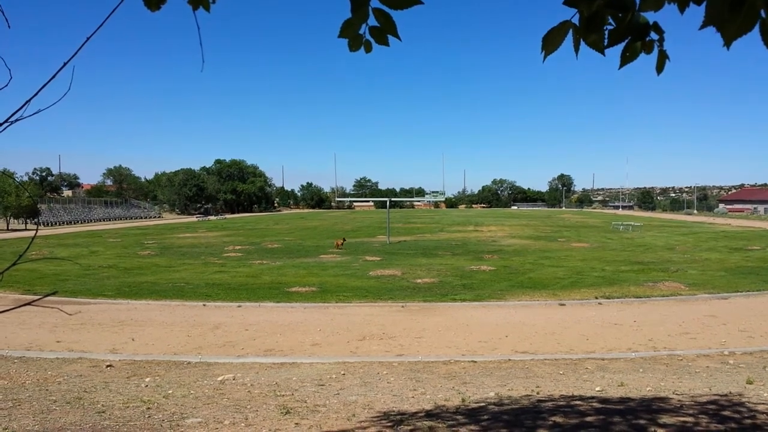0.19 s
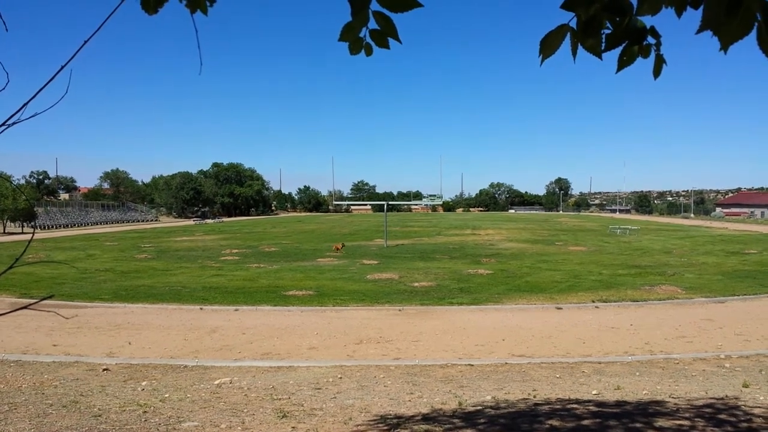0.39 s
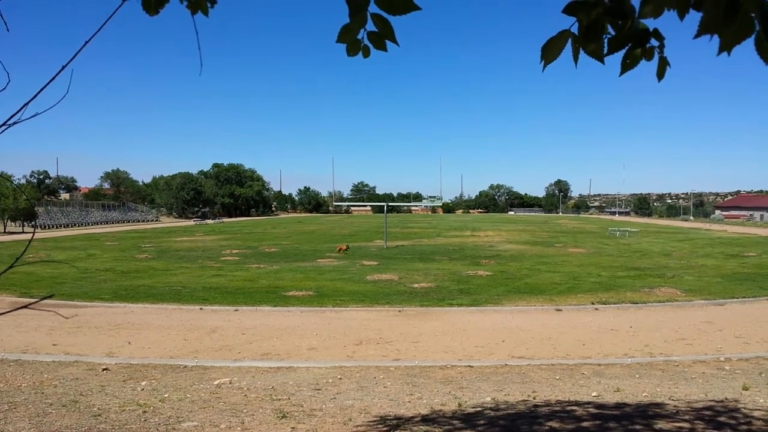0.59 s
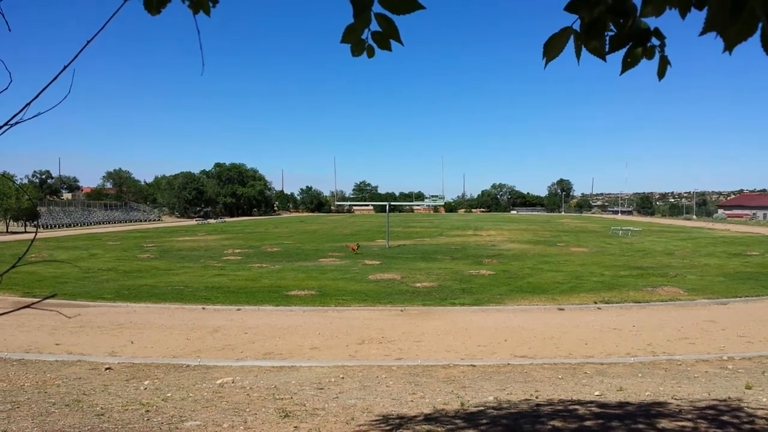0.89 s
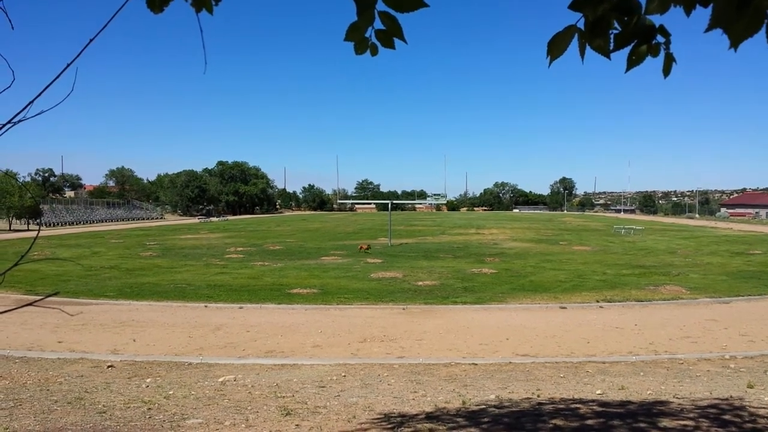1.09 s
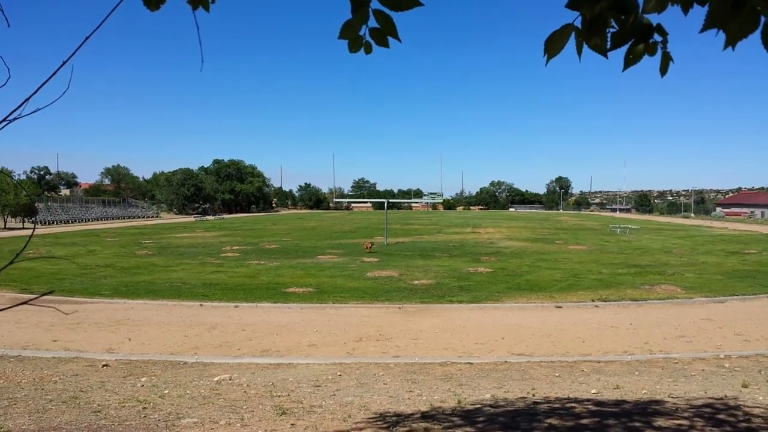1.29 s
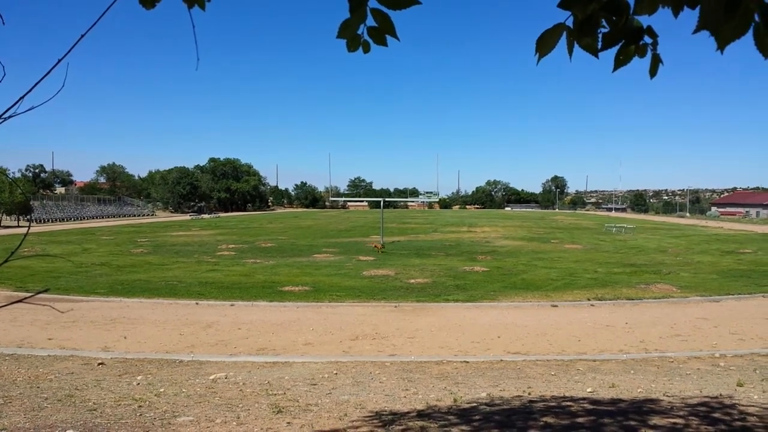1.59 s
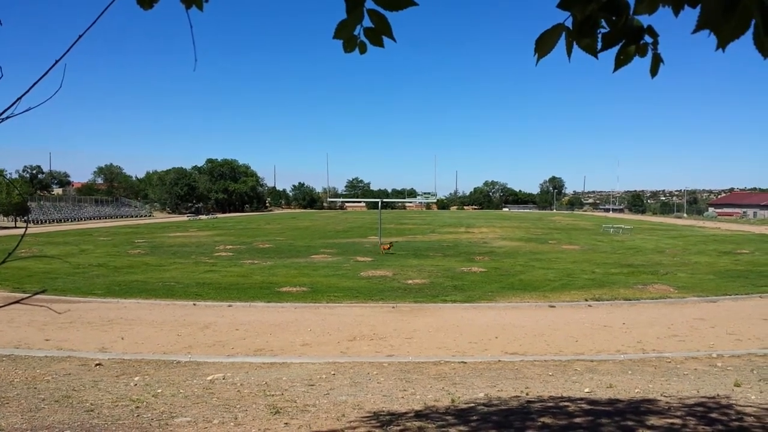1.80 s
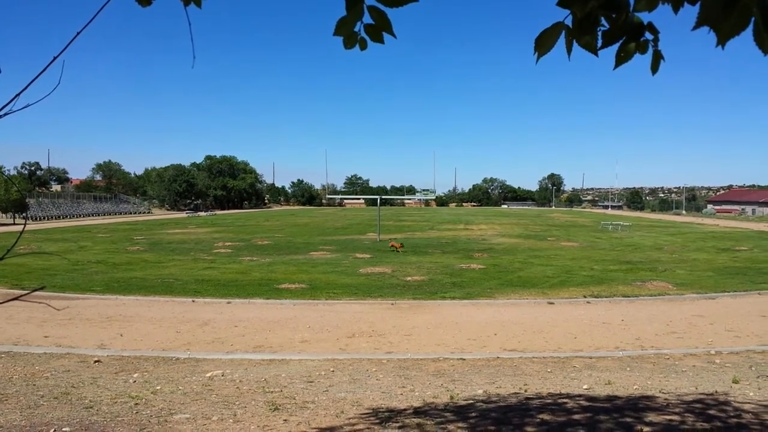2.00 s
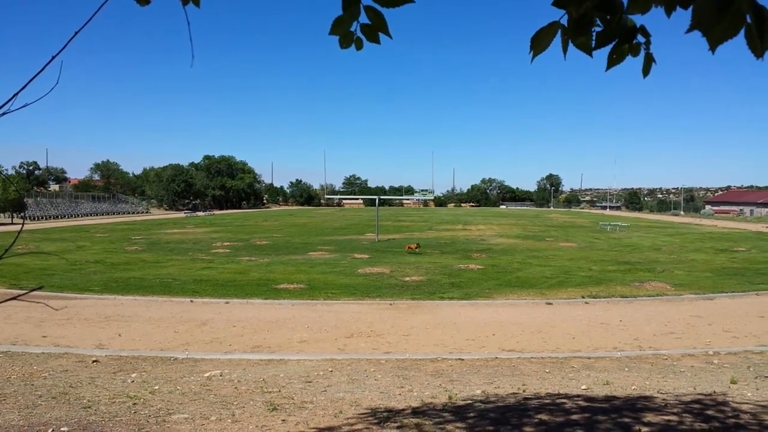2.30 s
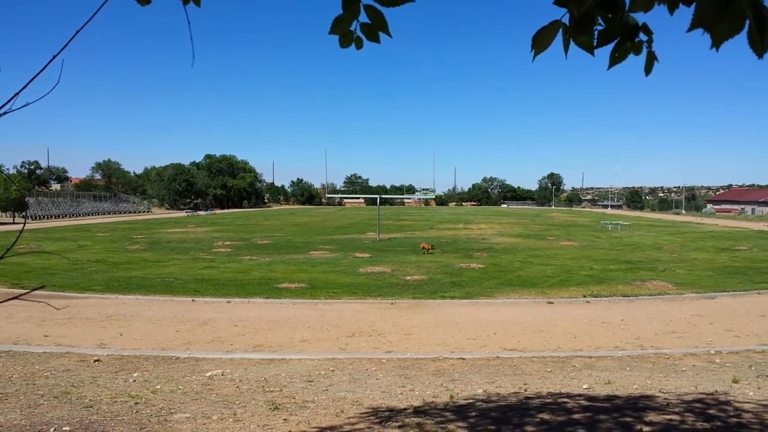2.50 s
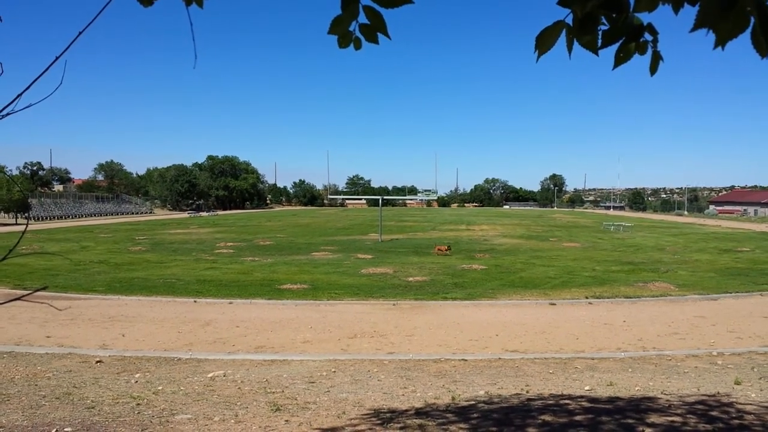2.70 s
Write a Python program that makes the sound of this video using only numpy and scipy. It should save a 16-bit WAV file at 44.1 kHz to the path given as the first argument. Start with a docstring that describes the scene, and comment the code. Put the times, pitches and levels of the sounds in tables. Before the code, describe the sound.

A prairie dog calls briefly in an open field, with close snaps and far engine throb.

```python
"""An open field: low rumble, outdoor air and a soft hiss, with faint bird-like chirps in the distance.
In the first half second, dry snaps and two gritty scuffs sound right by the microphone; sparser snaps
follow. A far engine throbs, its firings ringing the exhaust, and swells from about 1.3 s. At 1.56 s a
prairie dog gives a high yip, then two fluttering cries: buzz and breath shaped by its throat.
The engine falls back, and one last sharp snap lands at 2.6 s."""
import sys
import numpy as np
from scipy import signal
from scipy.fft import rfft, irfft
from scipy.io import wavfile
from scipy.ndimage import uniform_filter1d

SR = 44100
rng = np.random.default_rng(int(sys.argv[2]) if len(sys.argv) > 2 else 0)


def persist_wave(psi):
    """Save psi, clipped to +-1, as 16-bit WAV."""
    counts = np.round(np.clip(psi, -1, 1) * 32767).astype(np.int16)
    wavfile.write(sys.argv[1], SR, np.atleast_2d(counts).T)


N = 125685


def amp(db):
    """Decibels to gain."""
    return 10 ** (np.asarray(db) / 20)


def unit(x):
    """Scales to rms 1."""
    return x / np.sqrt(np.mean(x ** 2) + 1e-20)


def curve(table, t):
    """Automation: each column after the first, read at the times t."""
    times, *columns = np.transpose(table)
    return [np.interp(t, times, column) for column in columns]


def colour(x, table, column=1):
    """EQ by one gain column of a spectrum table."""
    columns, hz = np.transpose(table), np.fft.rfftfreq(x.shape[-1], 1 / SR)
    gain_db = np.interp(np.log(hz + 1), np.log(columns[0]), columns[column])
    return irfft(rfft(x) * amp(gain_db), x.shape[-1])


def pan(db):
    """Stereo gains for a level difference; positive leans left."""
    return amp(np.array([[db], [-db]]) / 2)


def add(mix, start_s, sound):
    """Mixes a sound in at start_s."""
    part = mix[:, max(round(start_s * SR), 0):][:, :sound.shape[-1]]
    part += sound[..., :part.shape[1]]


def wander(count, size):
    """Random drift of rms 1, smoothed over size samples."""
    return unit(uniform_filter1d(uniform_filter1d(rng.standard_normal(count), size), size))


def field_echo(x, wet_db, t60_s=0.17):
    """Thin scattered echoes from the ground and trees."""
    t = np.arange(SR // 2) / SR
    taps = rng.standard_normal((2, len(t))) * (rng.random((2, len(t))) < .05)
    taps *= amp(-60 * t / t60_s) * (t > .003)
    taps /= np.linalg.norm(taps, axis=1, keepdims=True)
    echoes = signal.fftconvolve(x, taps, axes=1)[:, :N]
    return (x + amp(wet_db) * echoes) / np.hypot(1, amp(wet_db))


def wash(spectrum, level_db, correlation, drift_db):
    """Coloured noise, partly shared by both sides, with a drifting level."""
    left, spread = rng.standard_normal((2, N))
    right = correlation * left + np.sqrt(1 - correlation ** 2) * spread
    noise = unit(colour(np.array([left, right]), spectrum))
    return noise * amp(level_db + drift_db * wander(N, size=1500))


def background():
    """The bed: low rumble near the centre, distant outdoor air and a fine, wide hiss."""
    # fader moves: time_s, rumble_db, air_db, hiss_db
    levels = [(0, -46.5, -55, -61.5), (.2, -59, -59, -65), (.4, -58, -62.5, -68.5), (.65, -63, -69, -74.5),
              (1.05, -61, -68, -74), (1.35, -49.5, -59.5, -65), (1.7, -44, -53.5, -62),
              (2.2, -43.5, -52.5, -59.5), (2.55, -44, -54, -60), (2.85, -52.5, -56, -62.5)]
    # EQ of each layer: frequency_hz, gain_db
    rumble_eq = [(20, -15.5), (45, -9.5), (80, 7), (130, -2.5), (200, 0.5), (300, -10.5), (500, -31),
                 (1000, -57)]
    air_eq = [(100, -24), (280, 2), (450, -1.5), (700, -3), (1000, -1.5), (1400, -11.5), (2000, -21),
              (3000, -21.5), (5000, -32), (10000, -56.5)]
    hiss_eq = [(500, -9.5), (2000, 5), (3000, -1.5), (5000, -2), (6800, -1.5), (7900, 0.5), (9000, -4),
               (12000, -4), (14500, -2.5), (14900, -26.5), (16000, -33.5)]
    rumble_db, air_db, hiss_db = curve(levels, np.arange(N) / SR)
    rumble = wash(rumble_eq, rumble_db, correlation=0.94, drift_db=2.0)
    air = wash(air_eq, air_db, correlation=.55, drift_db=0.9)
    hiss = wash(hiss_eq, hiss_db, correlation=0.033, drift_db=1.5)
    return rumble + air + hiss * pan(-.8)


def far_chirps(waver=.03):
    """Thin wavering whistles from far away, each gliding through three pitches."""
    # whistles: start_s, length_s, start_hz, middle_hz, end_hz, level_db
    chirps = [(0.013, 0.094, 2950, 2510, 2350, -67.5), (0.097, 0.038, 3650, 3400, 2800, -67.5),
              (0.294, 0.029, 4480, 4460, 4480, -67), (0.628, 0.03, 2600, 3050, 2980, -77.5),
              (.672, 0.02, 2750, 2660, 2400, -76.5), (0.982, 0.041, 4700, 4350, 3915, -70.5),
              (1.0, 0.066, 4400, 4790, 4830, -82), (1.005, 0.0502, 3900, 4226, 4210, -77),
              (1.283, .045, 2450, 2220, 1940, -77.5), (2.636, 0.038, 2400, 2640, 2640, -60),
              (2.786, 0.056, 4350, 4450, 4300, -65)]
    out = np.zeros((2, N))
    for start_s, length_s, *pitches_hz, level_db in chirps:
        progress = np.linspace(0, 1, round(length_s * SR))
        glide_hz = np.polyval(np.polyfit([0, .5, 1], pitches_hz, 2), progress)
        pitch_hz = glide_hz * (1 + waver * wander(len(progress), size=50))
        arch = np.sqrt(2 * abs(np.sin(np.pi * progress)))
        add(out, start_s, amp(level_db) * arch * np.sin(2 * np.pi * np.cumsum(pitch_hz) / SR))
    return out


def far_engine(uneven_db=1):
    """Uneven firings ring the exhaust over a clean hum at the firing rate."""
    # engine speed: time_s, firing_hz
    speed = [(0, 80), (.5, 78.3), (.8, 78.8), (1.35, 82.3), (1.65, 84.3), (1.95, 87.5), (2.25, 89.9),
             (2.55, 89.7), (2.85, 88)]
    # fader moves: time_s, hum_db, throb_db
    levels = [(0, -92, -54), (.2, -65, -53.5), (.4, -61, -62), (.65, -58.5, -68.5), (1.1, -58.5, -63.5),
              (1.3, -58, -50.5), (1.48, -43.5, -42.5), (1.8, -44, -41.5), (2.0, -41.5, -40),
              (2.2, -37.5, -41), (2.4, -42, -46), (2.6, -51.5, -62.5), (2.85, -52.5, -52.5)]
    # firings in one engine cycle: place (0-1), strength_db
    cylinders = [(.08, -22.5), (0.297, 3.5), (.48, -12), (0.721, 3.5), (.9, -13)]
    # exhaust resonances: frequency_hz, decay_s, gain_db
    pipe_modes = [(112, 0.007, -8), (159, 0.0058, 0.5), (197, 0.0025, -18), (300, 0.012, -20)]
    # EQ of the throb: frequency_hz, gain_db
    throb_eq = [(20, -29.5), (55, -6.5), (100, 7), (230, 6), (400, -0.5), (900, -31.5)]
    t = np.arange(N) / SR
    firings = np.cumsum(curve(speed, t)[0]) / SR
    pulses = np.zeros(N)
    for place, strength_db in cylinders:
        hits = np.flatnonzero(np.diff(np.floor(firings / len(cylinders) - place)))
        pulses[hits] += amp(strength_db + uneven_db * rng.standard_normal(100)[:len(hits)])
    age = t[:SR // 10]
    pipe = -sum(amp(db) * np.exp(-age / decay_s) * np.sin(2 * np.pi * hz * age)
                for hz, decay_s, db in pipe_modes)
    throb = unit(colour(signal.fftconvolve(pulses, pipe)[:N], throb_eq))
    hum = unit(np.cos(2 * np.pi * firings))
    hum_db, throb_db = curve(levels, t)
    return amp(throb_db) * throb + amp(hum_db) * hum


def scuffs():
    """Short gritty rubs that swell and stop, close on the left."""
    # rubs: start_s, length_s, base_db, swell_db, pan_db
    rubs = [(0.135, .068, -37.5, 9, 21.5), (0.411, 0.0762, -51, 13, 32.5)]
    # EQ of the grit: frequency_hz, gain_db
    grit_eq = [(150, -8.5), (500, -4), (950, 2.5), (1600, -3.5), (3000, -6), (5000, -6.5), (7500, -25.5),
               (11000, -40.5), (15000, -47.5)]
    out = np.zeros((2, N))
    for start_s, length_s, base_db, swell_db, pan_db in rubs:
        progress = np.linspace(0, 1, round(length_s * SR))
        grains = rng.standard_normal((2, len(progress))) * amp(2.8 * wander(len(progress), size=45))
        fade = np.clip(np.minimum(progress, 1 - progress) / 0.034, 0, 1)
        level_db = base_db + swell_db * (progress - 2)  # tops out swell_db below the base
        add(out, start_s, unit(colour(grains, grit_eq)) * fade * amp(level_db) * pan(pan_db))
    return out


def ring(hz, rise_s, delay_s):
    """One contact: a tone that peaks at rise_s and dies, free of DC, with a delay for each side."""
    age = np.maximum(np.arange(SR // 40) / SR - delay_s, 0)
    envelope = age / rise_s * np.exp(1 - age / rise_s)
    wave = np.sin(2 * np.pi * hz * age)
    return envelope * (wave - np.average(wave, axis=1, weights=envelope + 1e-12)[:, None])


def snaps(rebound_gain=0.43):
    """Dry double contacts: a soft thud, a dull knock, a crack and a bright tick, gone in milliseconds."""
    # contacts: start_s, knock_hz, crack_hz, thud_db, knock_db, crack_db, tick_db,
    # body_pan_db, crack_pan_db, tick_pan_db, rebound_s, left_lag_s
    contacts = [(.1405, 860, 2700, -57, -35, -50, -59, 21, 14, 8, .0003, 0.0033),
                (0.179, 1000, 2300, -55, -41, -47, -42, 9, 10, 12, 0.00022, -0.037),
                (0.2076, 951, 2810, -30, -10.5, -6.5, -4.5, 21, 18, 15, .00033, 0.0013),
                (0.2228, 620, 2160, -68, -37, -33.5, -60, 24, 15.5, -1, 0.00061, 0.0022),
                (0.2478, 905, 4460, -63, -46, -33, -34.5, 13, -10, -14.5, 0.00014, 0.0049),
                (0.3136, 600, 5000, -70, -68, -43.5, -53, 1, 19, 9, 0.00035, -0.01),
                (0.37, 1020, 2200, -59, -44.5, -50, -70, 16, 10, 1, .0003, 0),
                (0.403, 990, 3030, -64, -38.5, -46, -64, 23, 14, 5, 0.00028, 0.0021),
                (0.4764, 600, 3870, -57, -47.5, -59, -57, 8, 13, 13.5, 0.00029, -0.0059),
                (0.4784, 882, 3176, -71.5, -48, -42.5, -47.5, 21.5, 17, 6.5, 0.00024, 0.0032),
                (.601, 601, 3500, -75, -53.5, -55.5, -54, 16.5, 7.5, 6, 0.00029, 0.00063),
                (0.7738, 805, 2000, -63.5, -43, -62, -67.5, 21, 7, 2.5, .0002, 0.0019),
                (1.186, 1140, 2130, -67.5, -39, -60.5, -61.5, 21, 10, 5.5, 0.00055, 0.001),
                (1.283, 700, 1900, -55.5, -36, -44, -66, 14.5, 22, 2, 0.0011, -0.0056),
                (1.456, 750, 1980, -67, -39, -55, -69, 20, 6, 0, .0003, 0),
                (1.732, 610, 2000, -48.5, -29, -44, -59, 12, 6, 8, .0003, 0.0034),
                (1.7502, 1100, 4000, -63, -38, -37, -13.5, 11, 13, -14, 0.00024, .0002),
                (1.840, 816, 2200, -65, -30.5, -44, -56, 9, 12, 9, 0.00038, 0.0057),
                (1.947, 600, 2000, -40, -33.5, -54, -58, 15, 5, 1, 0.00023, 0.006),
                (2.496, 900, 2500, -73, -37.5, -42.5, -41, 4, 19, -10, 0.00047, 0),
                (2.5978, 616, 2760, -62, -21, -9, -11, 24.5, 14, -10.5, 0.000978, .0004)]
    out = np.zeros((2, N))
    for (start_s, knock_hz, crack_hz, thud_db, knock_db, crack_db, tick_db,
         body_pan_db, crack_pan_db, tick_pan_db, rebound_s, left_lag_s) in contacts:
        onset_s = np.maximum([[left_lag_s], [-left_lag_s]], 0)
        thud = amp(thud_db) * ring(hz=150, rise_s=0.0019, delay_s=onset_s)
        knock = amp(knock_db) * ring(knock_hz, rise_s=0.26 / knock_hz, delay_s=onset_s)
        snap = (thud + knock) * pan(body_pan_db)
        # only the bright parts strike again on the rebound
        for delay_s, gain in ((onset_s, 1), (onset_s + rebound_s, rebound_gain)):
            crack = ring(crack_hz, rise_s=0.00016, delay_s=delay_s)
            tick = ring(hz=6300, rise_s=.00007, delay_s=delay_s)
            sparkle = amp(-9.5) * ring(hz=9170, rise_s=.00006, delay_s=delay_s)
            snap += gain * amp(crack_db) * pan(crack_pan_db) * crack
            snap += gain * amp(tick_db) * pan(tick_pan_db) * (tick + sparkle)
        add(out, start_s, snap)
    return out


def call(contour, throat, flutter_hz=54.42, pitch_swing=.055, jitter=0.016, fade_s=0.0068):
    """Vocal-fold buzz and puffs of breath, fluttering in pitch and strength, pass through the throat."""
    t = np.arange(contour[0][0], contour[-1][0], 1 / SR)
    pitch_hz, level_db, depth, roughness = curve(contour, t)
    flutter_rate = flutter_hz * (1 + .04 * wander(len(t), size=600))
    flutter = depth * np.sin(2 * np.pi * np.cumsum(flutter_rate) / SR)
    bend = 1 + pitch_swing * flutter + jitter * wander(len(t), size=60)
    cycles = np.cumsum(pitch_hz * bend) / SR
    buzz = unit(sum(np.cos(2 * np.pi * k * cycles + k * k) for k in range(1, 15)))
    puffs = 0.54 + np.exp(-(cycles % 1) / 0.45)  # one per cycle of the folds
    breath = unit(puffs * rng.standard_normal(len(t)))
    fade = np.clip(np.minimum(t - t[0], t[-1] - t) / fade_s, 0, 1)
    source = ((1 - roughness) * buzz + 2.27 * roughness * breath) * unit(1 + flutter) * fade
    voice = unit(np.array([colour(source, throat, column=1), colour(source, throat, column=2)]))
    out = np.zeros((2, N))
    add(out, t[0], voice * fade * amp(level_db))
    return out


def prairie_dog(left_lag_s=0.00039):
    """A high yip runs into two lower, arching cries; they reach the left side a little later."""
    # voice contours: time_s, pitch_hz, level_db, flutter_depth (0-1), roughness (0-1)
    yip = [(1.56, 753, -61, .3, 0.4), (1.578, 848, -52.5, 0.1, 0.54), (1.595, 969, -41, 0.07, 0.08),
           (1.612, 1039, -42, 0.2, 0), (1.63, 966, -51, 0.24, 0.4), (1.648, 828, -51, 0.5, .45),
           (1.668, 720, -68, 0.4, 0.6)]
    first_cry = [(1.62, 386.2, -63, 0.94, 1), (1.655, 429, -45, 0.6, 0.69), (1.70, 507.3, -36, 0.27, 0.28),
                 (1.745, 560.6, -36, 0.31, 0.43), (1.785, 537.4, -35.5, 0.55, 0.3),
                 (1.83, 499.4, -34, 0.32, 0.12), (1.862, 476.7, -39, 0.21, 0.063),
                 (1.888, 395, -39.5, 0.092, 0.21), (1.902, 376, -69, .2, 0.4)]
    second_cry = [(1.905, 409, -53, 0.98, 0.61), (1.94, 478.6, -45, 0.43, 0.33),
                  (1.985, 531, -43, 0.46, 0.44), (2.025, 547, -44.5, 0.34, 0.26),
                  (2.07, 503.4, -43.5, 0.36, .14), (2.112, 468, -43.5, 0.64, 0.06),
                  (2.143, 410, -44.5, 0.36, 0.099), (2.165, 400, -82, 0.24, 0.25)]
    # throat colour of each call: frequency_hz, left_db, right_db
    yip_throat = [(800, -35, -61), (1910, -13.5, -25), (2420, 1, 0), (3050, 4, -4), (3500, 5.5, -8),
                  (3890, -21, 0), (5000, -23, -27), (8000, -55, -47)]
    first_throat = [(410, -11, -24.5), (760, -28.5, -15.5), (1166, 3, -13), (1674, -10.5, -12),
                    (2080, -22.5, -28), (2390, -23.5, -37), (2995, -7, -25), (3200, -26, -28),
                    (3860, -17.5, -29), (4170, -27, -35), (8000, -51, -40)]
    second_throat = [(400, -18, -25), (750, -33, -9), (1000, 3.5, 13), (1560, 11, 8), (2014, 0, -7),
                     (2280, -13, -27), (2800, 1.5, -25), (3380, -13, -21), (3720, -9, -29),
                     (4460, -25, -25), (8000, -45, -45)]
    left, right = call(yip, yip_throat) + call(first_cry, first_throat) + call(second_cry, second_throat)
    t = np.arange(N) / SR
    return np.array([np.interp(t - left_lag_s, t, left), right])


def scene():
    """The animal and the chirps echo in the field; engine, close noises and bed stay dry."""
    animal = field_echo(prairie_dog(), wet_db=-12)
    chirps = field_echo(far_chirps(), wet_db=-2.5)
    return animal + chirps + far_engine() + snaps() + scuffs() + background()


def record(dry, cutoff_hz=15800):
    """The loudest snap clips; then come the microphone's colour and a steep low-pass."""
    # microphone response: frequency_hz, gain_db
    microphone_eq = [(20, -5), (45, -2), (70, 0), (1000, 0), (11000, 0), (14400, -2), (15100, -18),
                     (17000, -40)]
    heard = colour(np.clip(dry, -1, 1), microphone_eq)
    low_pass = signal.firwin(255, cutoff_hz, window=("kaiser", 9), fs=SR)
    return signal.oaconvolve(heard, low_pass[None], "same")


dry = scene()
out = record(dry)
persist_wave(out)
```